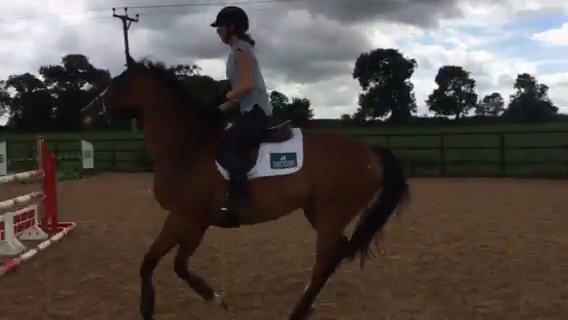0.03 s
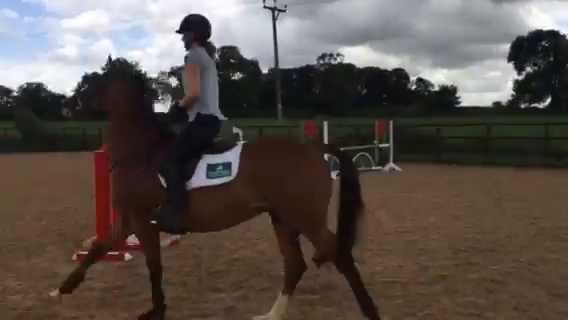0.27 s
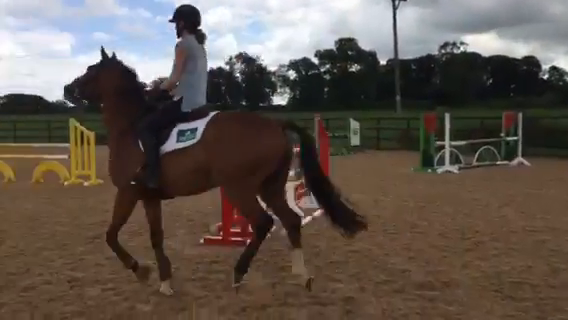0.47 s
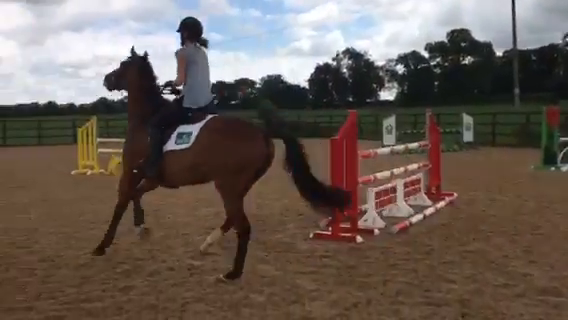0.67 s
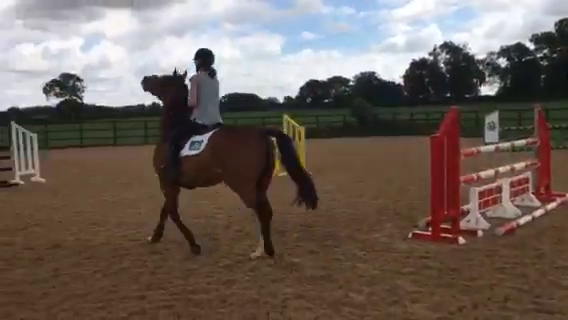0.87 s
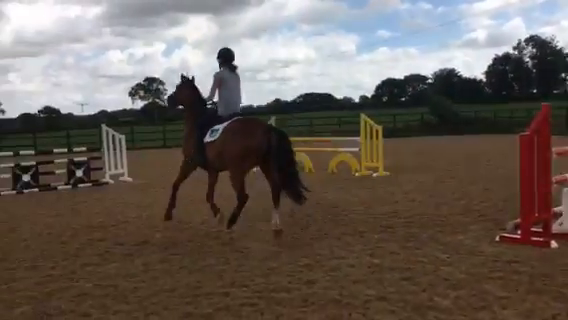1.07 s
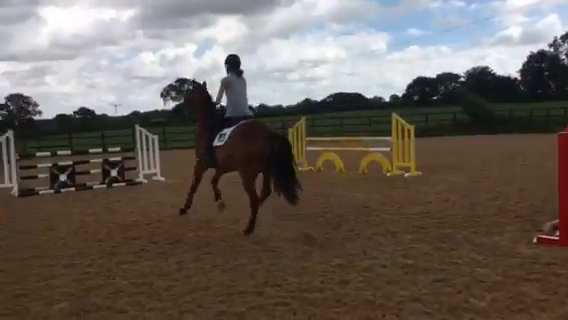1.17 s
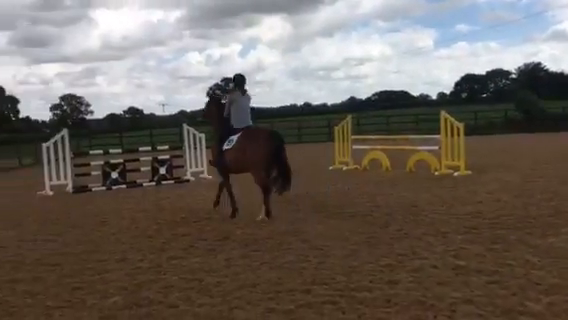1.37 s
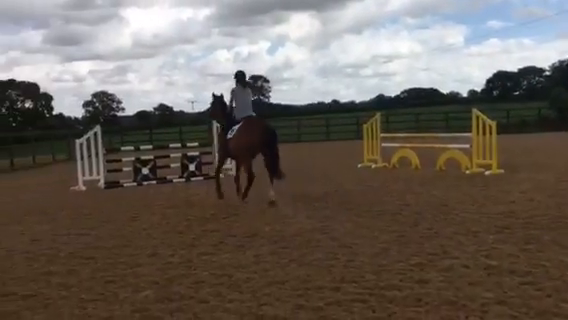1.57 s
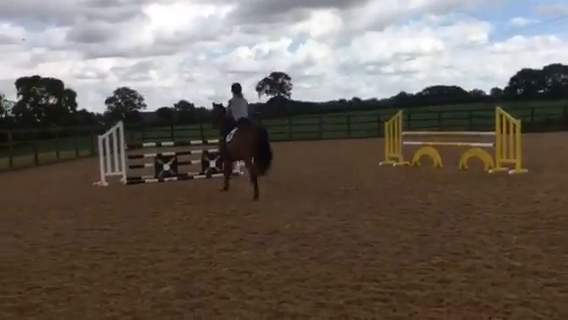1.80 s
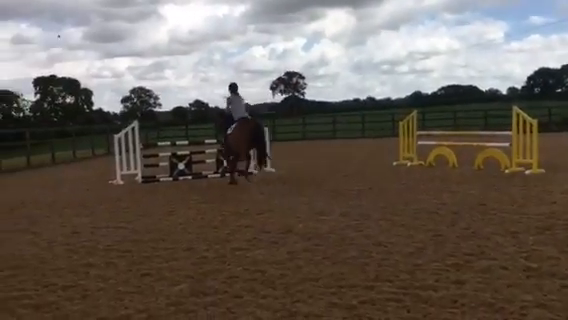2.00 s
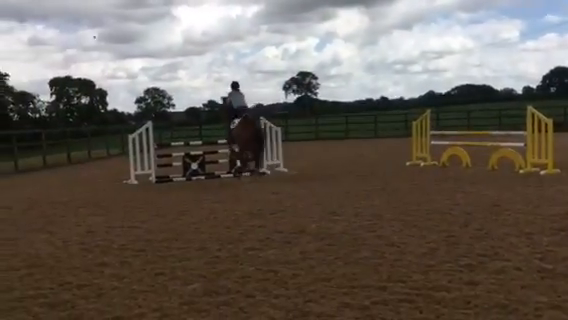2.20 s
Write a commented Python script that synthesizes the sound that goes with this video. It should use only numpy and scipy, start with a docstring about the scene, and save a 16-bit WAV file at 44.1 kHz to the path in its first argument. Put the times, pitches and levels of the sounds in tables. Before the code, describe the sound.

Muffled hoofbeats thump in quick, uneven groups as a horse canters by the microphone and away across an outdoor sand arena. Low wind buffeting, tiny gritty clicks and a faint open-air hiss run alongside.

```python
"""Outdoor sand arena: a horse canters past a hand-held microphone and away.
Each hoof gives a dull knock that sinks into a low thump; kicked sand swishes, small ticks sound.
Wind buffets the microphone over a soft outdoor hiss that fades as the horse leaves.
A tiny metallic ping sounds near the start, a faint distant tone near the end."""
import sys
import numpy as np
from scipy import signal
from scipy.fft import rfft, irfft
from scipy.io import wavfile
from scipy.ndimage import uniform_filter1d

SR = 44100
rng = np.random.default_rng(int(sys.argv[2]) if len(sys.argv) > 2 else 0)


def output_pcm(signal):
    """Save a mono or channel-first signal as 16-bit PCM at the path in sys.argv[1].

    Samples are clipped to [-1, 1] before scaling.
    """
    pcm = np.clip(np.atleast_2d(signal).T, -1, 1) * 32767
    wavfile.write(sys.argv[1], SR, np.round(pcm).astype(np.int16))


N = 99225


def undb(db):
    """Decibels to gain."""
    return 10 ** (np.asarray(db) / 20)


def unit(x):
    """Scale to rms 1."""
    return x / np.sqrt(np.mean(x ** 2) + 1e-18)


def colour(x, points):
    """Shape by (frequency [Hz], gain [dB]) points, -20 dB/octave outside them; rms 1."""
    hz, db = np.array(points, float).T
    bin_oct = np.log2(np.maximum(np.arange(N // 2 + 1) * SR / N, 1))
    point_oct = np.log2(hz)
    outside_oct = np.maximum(point_oct[0] - bin_oct, 0) + np.maximum(bin_oct - point_oct[-1], 0)
    gain_db = np.interp(bin_oct, point_oct, db) - 20 * outside_oct
    return unit(irfft(rfft(x) * undb(gain_db), N))


def noise():
    """White noise."""
    return rng.standard_normal(N)


def wander(rate_hz):
    """Smooth random drift, rms 1."""
    hold = max(int(SR / rate_hz), 1)
    steps = np.repeat(noise()[:N // hold + 1], hold)
    return unit(uniform_filter1d(steps, hold)[:N])


def curve(t, table, column):
    """Gain along one dB column of a table."""
    rows = np.array(table)
    return undb(np.interp(t, rows[:, 0], rows[:, column]))


def steady(x, span_s):
    """Even out the slow swells of a noise."""
    return x / np.sqrt(uniform_filter1d(x ** 2, max(int(span_s * SR), 8)) + 1e-6)


# Wind spectra (frequency [Hz], gain [dB])
RUMBLE_SPECTRUM = [(18, -36), (30, -13), (42, 0), (58, 0), (85, -2), (120, -5), (200, -28)]
FLUTTER_SPECTRUM = [(70, -10), (115, 0), (170, -2), (215, -10), (290, -11), (360, -20), (600, -28),
                    (900, -35), (1600, -50)]
# Gusts (time [s], rumble level [dB], relative flutter level [dB])
GUSTS = [(0, -47, -57), (.17, -51, -61), (.25, -34, -38), (.33, -42, -46), (.4, -49, -55), (.46, -40, -42),
         (.6, -44, -46), (.68, -40, -41), (.76, -42, -44), (.86, -40, -42), (.96, -38, -44),
         (1.03, -36, -41), (1.16, -38, -41), (1.22, -39, -44), (1.44, -37, -45), (1.66, -35, -46),
         (1.76, -39, -50), (1.84, -43, -54), (1.95, -40, -52), (2.03, -41, -52), (2.12, -49, -58),
         (2.25, -48, -55)]


def wind(t, flutter_db=-1.5, buffet_db=3):
    """Eddies at the microphone: deep rumble, quicker flutter."""
    rumble = steady(colour(noise(), RUMBLE_SPECTRUM), span_s=.07) * curve(t, GUSTS, column=1)
    flutter = steady(colour(noise(), FLUTTER_SPECTRUM), span_s=.04) * curve(t, GUSTS, column=2)
    return rumble + undb(flutter_db + buffet_db * wander(rate_hz=45)) * flutter


# Background spectra (frequency [Hz], gain [dB])
AIR_SPECTRUM = [(200, -4), (400, -2), (600, -5), (800, -6.5), (1200, -7), (1600, -9.5), (2200, -16),
                (3000, -30)]
HISS_SPECTRUM = [(1500, -16), (2200, -2), (3200, .5), (4300, -3), (4900, -8), (5600, -5), (6600, -6),
                 (7800, -13.5), (9300, -12.5), (10400, -21), (11300, -17.5), (15500, -20)]
# Background fade (time [s], relative air level [dB], relative hiss level [dB])
AIR_FADE = [(0.0, -56, -58), (0.36, -56, -58), (0.83, -59, -60), (1.14, -61, -64), (1.41, -60, -64),
            (1.84, -61, -64), (2.25, -61, -64)]


def open_air(t, air_db=3.1, drift_db=.6, hiss_db=-.3, grain_db=1.5):
    """Outdoor background: midrange air, faintly grainy hiss."""
    air = colour(noise(), AIR_SPECTRUM) * curve(t, AIR_FADE, column=1)
    air *= undb(air_db + drift_db * wander(rate_hz=20))
    grainy = noise() * undb(grain_db * wander(rate_hz=900))
    hiss = colour(grainy, HISS_SPECTRUM) * curve(t, AIR_FADE, column=2)
    return air + undb(hiss_db) * hiss


# Spectrum of grains and ticks (frequency [Hz], gain [dB])
GRIT_SPECTRUM = [(1500, -22), (2700, -8), (3700, 3.5), (5600, 4), (7500, -1.5), (9000, 1), (10400, -4),
                 (12000, -2.5), (15500, -4)]


def falling_grains(rate_per_s=60, level_db=-82, spread_db=3):
    """Single sand grains land at random."""
    landings = rng.random(N) < rate_per_s / SR
    strength = undb(spread_db * np.clip(noise(), -2, 2))
    return undb(level_db) * colour(landings * strength, GRIT_SPECTRUM)


# Dry ticks (time [s], relative level [dB], decay [s], high-pass edge [Hz])
DRY_TICKS = [(.0545, -39.5, .0026, 2000), (.074, -57, .005, 5500), (.1435, -45.5, .0006, 10000),
             (.172, -55, .003, 7500), (.1835, -44.5, .001, 7500), (.189, -54, .009, 6500),
             (.2945, -46.5, .0007, 9000), (.325, -57, .012, 3000), (.522, -48.5, .0008, 12500),
             (.579, -51, .006, 6000), (.852, -51, .006, 3000), (.895, -52, .003, 4500),
             (.98, -59, .004, 5000), (1.033, -52.5, .003, 4500), (1.107, -56.5, .009, 2000),
             (1.176, -57.5, .006, 2000), (1.373, -53.5, .005, 5000), (1.4, -60, .004, 6000),
             (1.428, -55.5, .006, 2000), (1.477, -50.5, .0007, 12500), (1.491, -49.5, .0007, 8500),
             (1.635, -56.5, .005, 4000), (1.931, -52, .0011, 2000), (2.073, -49, .0012, 5500)]


def ticks(t, gain_db=1.5, grain_db=2.5, rise_per_decay=.22):
    """Short gritty clicks, the finer ones all treble."""
    grainy = noise() * undb(grain_db * wander(rate_hz=1500))
    grit = steady(colour(grainy, GRIT_SPECTRUM), span_s=.002)
    clicks = np.zeros(N)
    for at_s, db, decay_s, edge_hz in DRY_TICKS:
        decays = np.clip((t - at_s) / decay_s, 0, 40)
        burst = undb(db) * (1 - np.exp(-decays / rise_per_decay)) * np.exp(-decays) * grit
        clicks += signal.sosfilt(signal.butter(2, edge_hz, "high", fs=SR, output="sos"), burst)
    return undb(gain_db) * clicks


def ping(t, at_s=.077, pitch_hz=15020, decay_s=.01, level_db=-61):
    """Tiny metallic ping: one damped sine."""
    age_s = np.maximum(t - at_s, 0)
    return undb(level_db) * np.sin(2 * np.pi * pitch_hz * age_s) * np.exp(-age_s / decay_s)


# Hoof impacts (time [s], relative thump level [dB], relative body level [dB],
# relative knock level [dB], thump and body base pitch [Hz], knock base pitch [Hz], length [ratio])
HOOF_IMPACTS = [(0.104, -35, -34, -49, 165, 330, 1.3), (0.199, -33, -31, -47, 175, 300, 1.1),
                (0.238, -24, -29, -46, 190, 330, 1.3), (0.263, -22, -21.5, -33, 195, 300, 1.3),
                (0.2695, -34, -16.5, -25.5, 265, 520, 1), (0.282, -33, -22, -38, 180, 330, 1.5),
                (0.301, -23, -33, -50, 165, 330, 1), (0.329, -35, -31, -45, 180, 300, 1.1),
                (0.4195, -19.5, -20.5, -26.5, 165, 450, .8), (0.454, -30, -36, -55, 190, 300, 1),
                (0.485, -38, -30, -42, 175, 380, .9), (0.525, -24, -36, -50, 175, 330, 1),
                (0.552, -27, -31, -47, 155, 300, .9), (0.579, -39, -32, -44, 220, 300, .9),
                (0.631, -24, -31, -41, 215, 380, 1), (0.65, -27, -27, -43, 160, 330, 1),
                (0.71, -22, -24, -44, 165, 320, 1), (0.729, -26.5, -24, -40, 180, 390, 1.1),
                (0.788, -24, -31, -46, 180, 310, .9), (0.826, -31, -28, -41, 230, 310, 1.1),
                (0.843, -22, -30, -49, 175, 330, 1), (0.875, -34, -30, -48, 140, 330, 1),
                (0.896, -17.5, -28, -44, 175, 330, 1), (0.906, -29, -24, -36.5, 195, 600, .9),
                (0.98, -35, -33, -44, 190, 350, 1), (1.005, -25, -25, -29, 190, 340, 1.4),
                (1.02, -36, -28, -36, 170, 340, 1), (1.047, -27, -29, -44, 170, 300, .8),
                (1.056, -24, -33, -32, 185, 490, .85), (1.066, -23, -28, -39, 165, 450, 1),
                (1.126, -28, -36, -54, 140, 330, 1), (1.154, -31, -32, -42, 215, 440, 1),
                (1.183, -31, -26, -41, 160, 370, 1), (1.249, -29, -29, -48, 170, 330, 1),
                (1.282, -33, -25, -34, 190, 410, .9), (1.299, -38, -33, -38, 200, 450, 1),
                (1.314, -29, -28, -36, 155, 420, .9), (1.364, -24, -34, -52, 155, 330, 1),
                (1.402, -28, -30, -41, 165, 360, 1), (1.485, -30, -35, -55, 140, 300, 1),
                (1.536, -29, -33, -46, 160, 350, 1), (1.594, -33, -30, -42, 170, 350, 1),
                (1.605, -28, -26, -32.5, 190, 450, 1), (1.643, -30, -30, -40, 205, 380, .85),
                (1.702, -26, -33, -53, 165, 300, 1), (1.893, -30, -42, -52, 160, 330, 1),
                (1.911, -34, -32, -37, 170, 400, 1), (1.948, -27, -49, -52, 165, 400, 1),
                (1.991, -35, -30, -38.5, 165, 350, 1), (2.071, -36, -35, -49, 175, 290, 1.1),
                (2.167, -35, -38, -53, 205, 260, 1.1)]


def ground_resonance(t, mode, level_column, pitch_column, sag_s=.007, tail_db=-35, tail_s=.02):
    """One damped ground mode plus loose sand, per impact; pitch sinks as the hoof digs in."""
    pitch_ratio, sand_hz, rise_s, decay_s, delay_s, gain_db, sand_share, sag = mode
    sand_spectrum = [(sand_hz / 2, -10), (sand_hz * .8, 0), (sand_hz * 1.25, -1), (sand_hz * 2, -20)]
    sand = steady(colour(noise(), sand_spectrum), span_s=3 / sand_hz)
    out = np.zeros(N)
    for impact in HOOF_IMPACTS:
        at_s, length = impact[0], impact[-1]
        span = slice(*np.searchsorted(t, [at_s - .02, at_s + .15]))
        age_s = np.maximum(t[span] - at_s - delay_s, 0)
        attack = 1 - np.exp(-(age_s / (rise_s * length)) ** 2)
        envelope = attack * np.exp(-age_s / (decay_s * length))
        envelope /= envelope.max() + 1e-12
        pitch_hz = pitch_ratio * impact[pitch_column] * np.exp(.04 * rng.standard_normal())
        cycles = pitch_hz * (age_s + sag * sag_s * (1 - np.exp(-age_s / sag_s)))
        blow = np.sqrt(1 - sand_share ** 2) * np.sin(2 * np.pi * cycles) + sand_share * sand[span]
        tail = undb(tail_db) * sand[span] * attack * np.exp(-age_s / tail_s)
        out[span] += undb(impact[level_column] + gain_db) * (blow * envelope + tail)
    return out


# Ground modes (pitch [x base], sand noise centre [Hz], base rise [s], base decay [s], delay [s],
# gain [dB], sand share [ratio], initial pitch excess [ratio])
THUMP_MODE = (.36, 70, .011, .0115, -.009, 0, .15, .45)
BODY_MODE = (.83, 185, .0042, .0055, -.0015, -1.7, .3, .45)
KNOCK_MODE = (1, 390, .0018, .0033, -.0016, 2, .35, .1)


def hooves(t, muffle_hz=770):
    """Hooves strike the ground: thump, body and knock, muffled by sand."""
    thump = ground_resonance(t, THUMP_MODE, level_column=1, pitch_column=4)
    body = ground_resonance(t, BODY_MODE, level_column=2, pitch_column=4)
    knock = ground_resonance(t, KNOCK_MODE, level_column=3, pitch_column=5)
    return signal.sosfilt(signal.butter(6, muffle_hz, fs=SR, output="sos"), thump + body + knock)


# Sand sprays (time [s], half length [s], level [dB], centre [Hz])
SPRAYS = [(.17, .04, -58, 1200), (.51, .035, -57, 1200), (.87, .035, -60, 1200), (1.022, .035, -52, 1150),
          (1.112, .009, -61.5, 5000), (1.428, .02, -60.5, 4000), (1.59, .03, -61, 1100),
          (1.938, .007, -60, 3100), (2.028, .008, -58.5, 2200)]
# Spray spectrum (frequency [x centre], gain [dB])
SPRAY_SPECTRUM = [(.35, -12), (.75, -1), (1.2, 0), (1.8, -11), (3.5, -24)]


def kicked_sand(t, grain_db=2):
    """Sprays of kicked sand swell and fall."""
    out = np.zeros(N)
    for at_s, half_s, db, centre_hz in SPRAYS:
        grainy = noise() * undb(grain_db * wander(rate_hz=600))
        spray = colour(grainy, [(centre_hz * ratio, gain_db) for ratio, gain_db in SPRAY_SPECTRUM])
        out += undb(db) * np.exp(-((t - at_s) / half_s) ** 2) * spray
    return out


def distant_tone(t, at_s=1.782, pitch_hz=600, half_s=.016, sag_hz_per_s=900, level_db=-52):
    """A faint tone swells, sinks a little and fades."""
    lag_s = t - at_s
    cycles = pitch_hz * lag_s - sag_hz_per_s * lag_s ** 2 / 2
    return undb(level_db) * np.exp(-(lag_s / half_s) ** 2) * np.sin(2 * np.pi * cycles)


def scene():
    """Horse, wind and background at one microphone."""
    t = np.arange(N) / SR
    events = hooves(t) + kicked_sand(t) + ticks(t) + ping(t) + falling_grains() + distant_tone(t)
    return (events + wind(t) + open_air(t))[None]


def record(dry, low_hz=30, top_hz=15800):
    """Recorder band limits: gentle bass cut, steep top cut."""
    x = signal.sosfilt(signal.butter(2, low_hz, "high", fs=SR, output="sos"), dry)
    return signal.sosfilt(signal.ellip(10, .2, 70, top_hz, fs=SR, output="sos"), x)


dry = scene()
out = record(dry)
output_pcm(out)
```